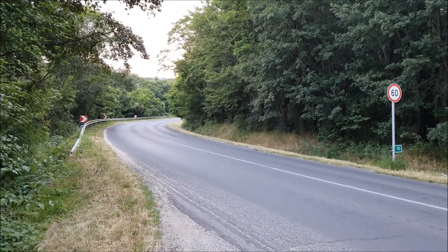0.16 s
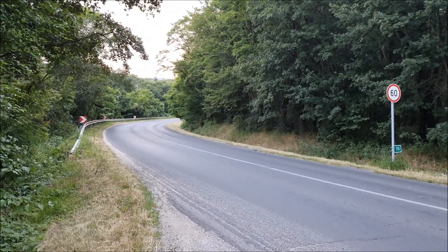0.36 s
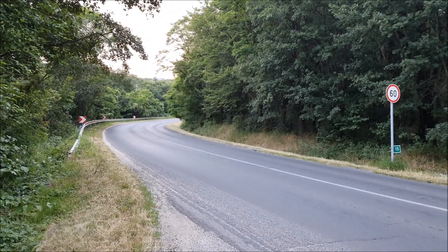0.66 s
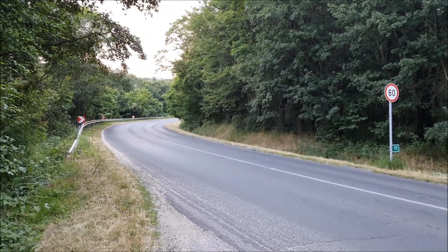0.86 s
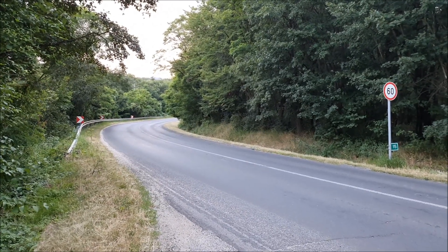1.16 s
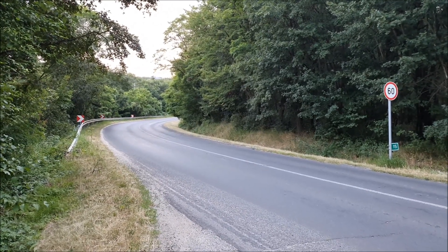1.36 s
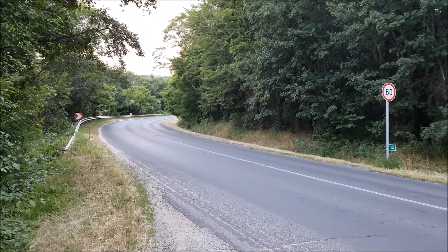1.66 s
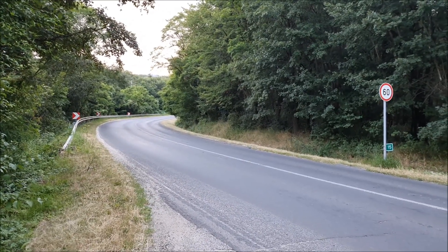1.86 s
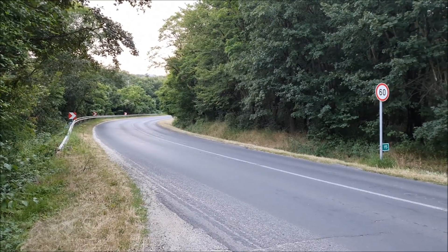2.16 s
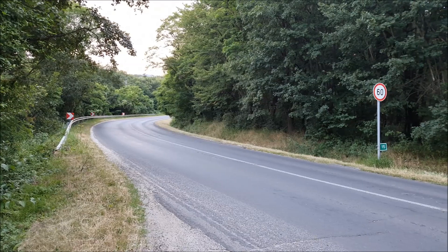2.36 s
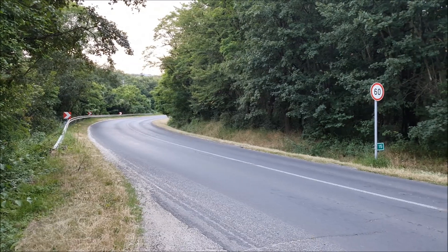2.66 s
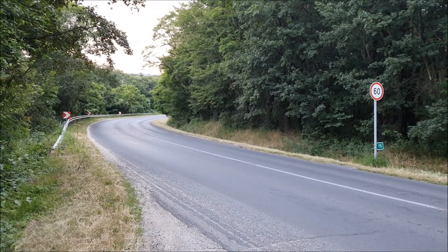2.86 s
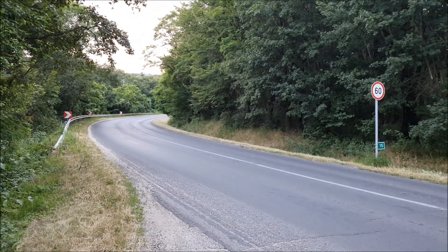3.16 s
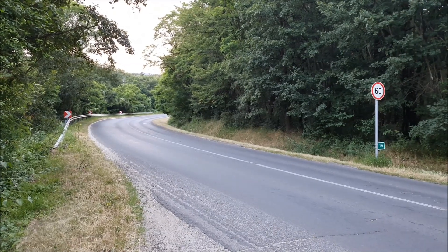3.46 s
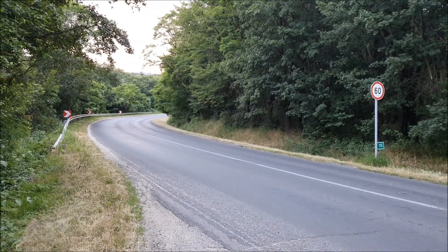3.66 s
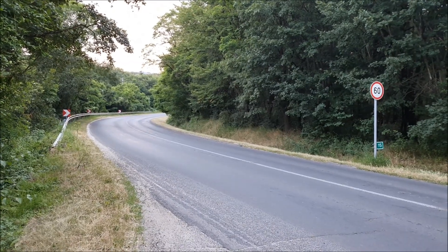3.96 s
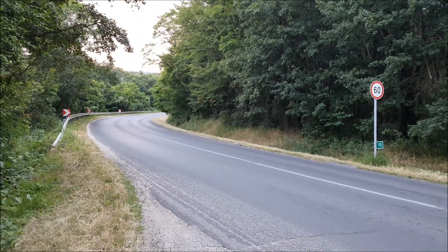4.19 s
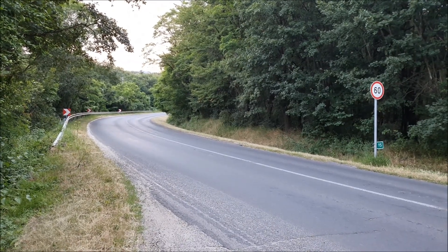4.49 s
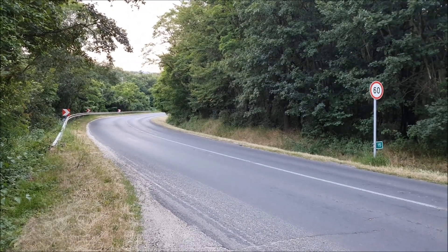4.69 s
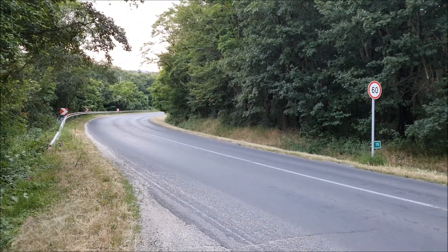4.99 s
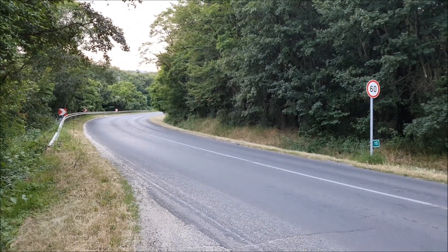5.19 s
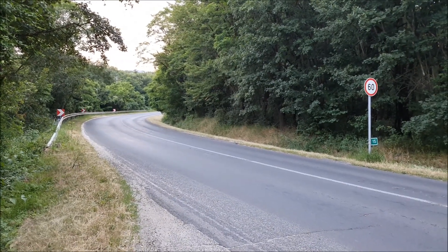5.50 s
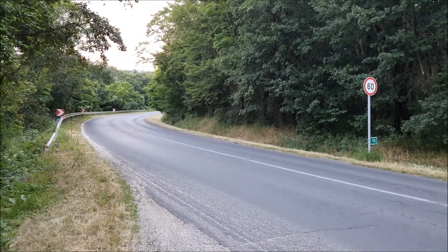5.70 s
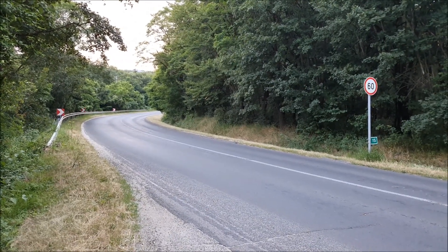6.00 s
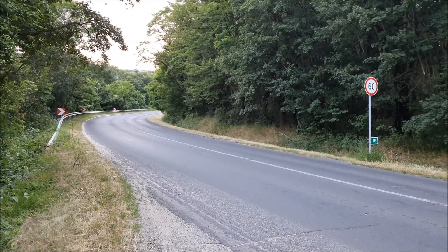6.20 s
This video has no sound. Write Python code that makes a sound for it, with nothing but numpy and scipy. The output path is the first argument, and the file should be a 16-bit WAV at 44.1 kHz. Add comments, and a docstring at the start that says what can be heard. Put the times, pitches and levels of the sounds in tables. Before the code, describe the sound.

An unseen six-cylinder car drones lower on a forest road, then its exhaust pops and cracks sharply, echoing among the trees.

```python
"""A forest road: a six-cylinder car coasts away behind the trees, its exhaust droning lower and lower.
The drone is a sine at the firing order; wavering sines at other crank orders and shaped noise join it.
Unburnt fuel pops in the pipe: a dull thump, then a sharp crack of scattered shocks.
Decaying noise echoes ring among the trunks; a low squeak, then far birds, are short gliding sines.
Two microphone ports hear it all over a thin hiss."""
import sys
import numpy as np
from scipy import signal
from scipy.fft import rfft, irfft, next_fast_len
from scipy.io import wavfile
from scipy.ndimage import uniform_filter1d, map_coordinates

SR = 44100
rng = np.random.default_rng(int(sys.argv[2]) if len(sys.argv) > 2 else 0)


def persist_wave(psi):
    """Save psi, clipped to +-1, as 16-bit WAV."""
    counts = np.round(np.clip(psi, -1, 1) * 32767).astype(np.int16)
    wavfile.write(sys.argv[1], SR, np.atleast_2d(counts).T)


N = 279679
TIME = np.arange(N) / SR  # seconds

# Course of the car's levels: (time [s], drone level [dB], tyre roar level [dB])
CAR_LEVELS = [(0, -31.5, -40), (.2, -30.5, -43), (.3, -26.5, -43), (.6, -29, -45), (1.4, -29.5, -46),
              (2.1, -28.5, -47), (3.25, -30.5, -48.5), (3.55, -32.5, -49.5), (4.05, -41, -51.5),
              (4.4, -35.5, -51.5), (5.0, -38.5, -46.5), (6.34, -39, -49.5)]
# Crank orders beside the firing order: (order [cycles per crank turn], relative level [dB])
SIDE_ORDERS = [(1, -12), (2, -4.5), (4, 1), (5, -2.5), (6, -20), (7, -16), (8, -11.5), (9, -11.5),
               (10, -14), (13, -13.5), (14, -7.5), (15, -21.5), (18, -20)]
# Missed firings: (time [s], gap length [s], drone drop [dB], below 0 counts as none)
STUMBLES = [(0.236, 0.041, -2), (0.438, 0.042, 23), (1.536, 0.01996, 3.5)]
# Spectrum of the exhaust rumble: (frequency [Hz], relative level [dB])
RUMBLE_SPECTRUM = [(20, -31), (45, -13.5), (80, 7), (150, 1.5), (200, 6), (245, -6.5), (350, 1), (520, -5),
                   (640, -10.5), (900, -22.5), (2000, -33.5), (4500, -53), (7500, -70.5), (12000, -80.5)]
# Spectrum of the tyre roar: (frequency [Hz], relative level [dB])
ROAR_SPECTRUM = [(350, -40.5), (600, -24), (780, 2.5), (1040, -3), (1300, -1), (1700, -3.5), (2000, -12.5),
                 (2400, -16), (2800, -27), (3200, -31), (4000, -35.5), (5000, -47), (6500, -59.5),
                 (7500, -69), (9000, -94)]
# Pops: (time of the suction [s], thump level [dB], thump pitch [Hz], crack level [dB],
# crack brightness [dB per octave], crack length [s], favoured resonance [Hz], resonance boost [dB])
POPS = [(1.524, -33, 105.3, -23, 0, 0.0035, 1880, -0.5), (3.628, -25, 100, -16.5, -1, 0.0044, 1193, 3),
        (3.637, -5.5, 90.5, -13, -1.5, 0.0076, 1730, 17.5), (4.595, -18, 169, -7, 0.5, 0.0037, 1080, 3),
        (4.599, -35, 117, -10.5, -0.5, 0.0065, 760, 6.5), (4.611, -17.5, 84, -46, 1.5, .006, 2120, 5),
        (4.949, -17.5, 111, -10.5, -1, 0.0073, 760, 1.5), (5.186, -15.5, 99, -20, -1, .006, 1250, 7),
        (5.3967, -18, 105.5, -18, 4.5, 0.0044, 940, 1.5), (5.5963, -18, 114, -24.5, -2, 0.0062, 741, 3),
        (5.8394, -16, 104, -20.5, 1, 0.009, 905, 9), (6.014, -19.5, 108, -23.5, -2.5, 0.0084, 1671, 10),
        (6.205, -17, 111, -16.5, 0, 0.0071, 1640, 10)]
# Colour the pipe gives a crack: (frequency [Hz], relative level [dB])
PIPE_COLOUR = [(250, -13), (450, -5.5), (600, -3.5), (760, 3), (950, -3), (1150, -2.5), (1400, -8.5),
               (1700, -6), (2100, -6.5), (2600, -12), (3500, -16.5), (4400, -32.5), (5400, -50.5),
               (6200, -64.5), (7400, -81), (9000, -60), (13000, -74.5)]
# Silencer ring on each thump: (pitch [Hz], time to its peak [s], level relative to the crack [dB])
SILENCER_RING = (418, 0.0022, -14)
# Echo decay among the trunks: (frequency [Hz], time to lose 60 dB [s])
FOREST_DECAY = [(100, 1.7), (400, 2.8), (1000, 0.51), (2500, .85), (4000, .6), (5500, 0.48), (10000, 0.069)]
# Colour of the echoes: (frequency [Hz], relative level [dB])
FOREST_TONE = [(100, -24.5), (220, -13.5), (400, 4.5), (1000, -13.5), (1700, -3.5), (2800, -10), (4000, -3),
               (5200, 3.5), (8000, -4.5)]
# Squeak and bird notes, the first row a short low squeak, probably of the car, the others birds:
# (time [s], length [s], start pitch [Hz], end pitch [Hz], level [dB],
# trill amount [0-1], left minus right ahead of the ports [dB])
NOTES = [(0.251, 0.047, 1213, 1256, -36.5, 1, -1), (0.324, 0.081, 5970, 5750, -65.5, .9, 6.5),
         (0.409, 0.098, 6000, 5820, -64, 0.98, 4.5), (0.598, 0.047, 5900, 5720, -73, 0.8, 14),
         (0.971, 0.073, 3710, 3840, -65, .9, 1.5), (1.284, 0.043, 3300, 3120, -59, 0.5, 9),
         (1.61, 0.07, 4760, 4460, -66, 1, -1.5), (1.79, 0.016, 3750, 3744, -62.5, 0.7, -0.5),
         (1.814, 0.033, 5140, 5170, -73, 0.6, -6.5), (1.861, 0.078, 3080, 2980, -67.5, .6, 0),
         (2.031, 0.046, 3810, 3750, -52.5, .2, 4.5), (2.076, 0.073, 3870, 3950, -66, 0.96, 3),
         (2.124, 0.091, 2730, 2650, -65.5, 1, 0), (2.31, 0.051, 3100, 3060, -69.5, .6, 2.5),
         (2.512, 0.076, 3430, 3320, -46.5, .25, -3), (2.749, 0.078, 3540, 3200, -48.5, 0.5, 2.5)]
# Spectrum of the microphone hiss: (frequency [Hz], relative level [dB])
HISS_SPECTRUM = [(3000, -21), (6000, -10.5), (7500, -23.5), (7900, -3.5), (8700, -3), (9800, -1),
                 (10600, -7.5), (12000, -7.5), (15700, -17.5)]
# Course of the hiss: (time [s], level [dB])
HISS_LEVELS = [(0, -76.5), (.25, -79.5), (.45, -81.5), (.6, -77.5), (3.6, -77.5), (3.75, -86), (4.3, -79),
               (5.5, -78), (6.34, -77.5)]
# Phase between the ports: (frequency [Hz], lead of the left port [radians])
PORT_LEAD = [(200, 0), (520, .3), (860, .5), (1200, 1), (1550, 1.8), (1900, 2.7), (2300, 2.2), (2900, 2.5),
             (3600, 3.1), (4300, 3.9), (5100, 6.28)]
# Level between the ports: (frequency [Hz], left minus right [dB])
PORT_TILT = [(100, -1.24), (500, -1), (860, -2), (1200, -6), (1600, -5), (2200, -7), (2800, 3), (4000, -6),
             (5800, 5), (7200, -13.5), (8600, 17.5), (9500, 9), (10700, -1), (12000, 2)]
# How alike the two channels of a noise are: (frequency [Hz], likeness [0-1])
LIKENESS = [(100, 1), (300, 0.85), (700, 0.42), (1500, 0.89), (2300, .5), (3200, 0.4), (5000, 0.8),
            (8000, 0.1), (11300, 0.82), (12500, 0.3), (15000, .55)]

FIRING = 3  # the crank order at which the cylinders fire
CRANK_HZ, SAG_HZ_PER_S = 40.28, 1.53  # crank turns a second at the start, and how fast they sink
SLIP_PER_S2 = 95  # share of speed lost in a missed firing, times the square of the gap length
CATCH_UP_S = 0.04  # time constant of the speed's return after a missed firing
LIFT_S = 0.16  # the throttle shuts
OVERRUN_S, OVERRUN_RAMP_S = 4.6, 0.45  # start of the overrun burble and the time it takes to set in
# Side orders: throttle open, time to lose 10 dB, coasting, overrun
SIDE_OPEN_DB, SIDE_FALL_S, SIDE_COAST_DB, SIDE_OVERRUN_DB = -32, 0.06, -47.5, -44
BRIGHT_COAST_DB, BRIGHT_OVERRUN_DB = -0.5, -3  # brightness of the side orders, dB per octave
FOURTH_OVERRUN_DB = 2.5  # uneven burning lifts the fourth order
SIDE_WAVER_DB = 3  # rms level waver of each side order
# Rumble: throttle open, time to lose 10 dB, coasting
RUMBLE_OPEN_DB, RUMBLE_FALL_S, RUMBLE_COAST_DB = -29.5, 0.89, -48
# Rumble left by a pop: relative to its thump, swell time, time to lose 10 dB
GURGLE_DB, GURGLE_RISE_S, GURGLE_FALL_S = -29.5, 0.12, 0.58
SUCTION_S = 0.015  # from the start of a thump to its suction
CRACK_AFTER_S = 0.0168  # from the suction to the open crack
WAVER = 0.024  # rms pitch unsteadiness of a fully trilled note, as a share
NOTE_LAG_S = 0.00004  # squeak and birds come this much later on the left, ahead of the ports
LOW_CUT_HZ, EDGE_HZ = 31, 15700  # bass cut and upper band limit


def engine():
    """The firing order drones clean, the other orders waver; rumble and tyre roar lie under them."""
    s, *columns = np.transpose(CAR_LEVELS)
    drone_db, roar_db = (np.interp(TIME, s, column) for column in columns)
    crank_hz = CRANK_HZ - SAG_HZ_PER_S * TIME
    overrun = np.clip((TIME - OVERRUN_S) / OVERRUN_RAMP_S, 0, 1)
    rumble_power = gain_of(2 * RUMBLE_COAST_DB) + fading(RUMBLE_OPEN_DB, 0, RUMBLE_FALL_S)

    # a missed firing leaves a gap and the next ones come late
    for at, length, drop_db in STUMBLES:
        gap = np.exp(-((TIME - at) / (length / 2)) ** 4)
        drone_db = drone_db - max(drop_db, 0) * gap
        catching_up = np.exp(-abs(TIME - at) / CATCH_UP_S)
        slip = np.where(TIME > at, catching_up, gap)
        crank_hz = crank_hz * (1 - SLIP_PER_S2 * length ** 2 * slip)

    # the blast empties the pipe: the drone has to build up again, the pipe gurgles on
    for at, thump_db, *_ in POPS:
        drone_db = drone_db - 7 * np.exp(-((TIME - at - 0.025) / 0.023) ** 2)
        swell = np.clip((TIME - at) / GURGLE_RISE_S, 0, 1)
        rumble_power = rumble_power + swell * fading(thump_db + GURGLE_DB, at, GURGLE_FALL_S)

    phase = 2 * np.pi * np.cumsum(crank_hz * (1 + 0.006 * drift(12))) / SR
    drone = gain_of(drone_db + 0.74 * drift(13)) * np.sqrt(2) * np.sin(FIRING * phase)
    side = side_orders(phase, overrun)
    rumble = np.sqrt(rumble_power) * noise(RUMBLE_SPECTRUM, 0.95)
    roar = gain_of(roar_db) * noise(ROAR_SPECTRUM, 1.3)
    return drone + side + rumble + roar


def side_orders(phase, overrun):
    """Sines at the other crank orders: they sink as the throttle shuts and come up again on overrun."""
    floor_db = SIDE_COAST_DB + (SIDE_OVERRUN_DB - SIDE_COAST_DB) * overrun
    closing = 10 ** (-np.maximum(TIME - LIFT_S, 0) / SIDE_FALL_S)
    power = gain_of(2 * floor_db) + gain_of(2 * SIDE_OPEN_DB) * closing
    bright_db = BRIGHT_COAST_DB + (BRIGHT_OVERRUN_DB - BRIGHT_COAST_DB) * overrun
    total = np.zeros(N)
    for order, db in SIDE_ORDERS:
        level_db = db + bright_db * np.log2(order / FIRING) + SIDE_WAVER_DB * drift(5.9)
        if order == FIRING + 1:
            level_db = level_db + FOURTH_OVERRUN_DB * overrun
        total += gain_of(level_db) * np.sin(order * phase + 1.0 * drift(6))
    return np.sqrt(power) * total


def pops():
    """A muffled rattle rides on each thump, the open crack follows; thumps, cracks and blasts apart."""
    thumps, cracks, blasts = np.zeros((3, N))
    for s, thump_db, hz, crack_db, bright_db, length, peak_hz, peak_db in POPS:
        add(thumps, s - SUCTION_S, gain_of(thump_db) * thump(hz, crack_db - thump_db))
        rattle, _ = crack(bright_db - 6.5, 0.023, peak_hz, 0, rise=0.01)
        add(cracks, s - 0.003, gain_of(crack_db - 7.5) * rattle)
        sound, blast = crack(bright_db, length, peak_hz, peak_db, rise=0.0013)
        add(cracks, s + CRACK_AFTER_S, gain_of(crack_db) * sound)
        add(blasts, s + CRACK_AFTER_S, gain_of(crack_db) * blast)
    return thumps, cracks, blasts


def thump(hz, crack_over_thump_db):
    """A short swing of pressure around a sharp suction; its pitch sags as it dies, the silencer rings."""
    t = np.arange(-SUCTION_S, 0.04, 1 / SR)
    turns = hz * (t - 10 * t ** 2 * (t > 0))
    width = np.where(t < 0.002, 0.006, 0.012)  # swells faster than it dies
    shape = np.exp(-((t - 0.002) / width) ** 2)
    ring_hz, ring_peak_s, ring_db = SILENCER_RING
    u = np.maximum(t + 0.0022, 0) / ring_peak_s
    ring = u * np.exp(1 - u) * np.cos(2 * np.pi * ring_hz * t)
    snatch = 0.35 * np.exp(-(t / 0.00085) ** 2)  # the suction comes to a sharp point
    return -np.cos(2 * np.pi * turns) * shape - snatch - gain_of(crack_over_thump_db + ring_db) * ring


def crack(bright_db, length, peak_hz, peak_db, rise):
    """One shock, then scattered ones, coloured by the pipe and the long way through the trees.

    Also their energy as one blast without the favoured resonance, which is what the trunks send back."""
    t, hz = np.arange(1500) / SR, np.fft.rfftfreq(4096, 1 / SR)
    size, chance = rng.standard_normal((2, len(t)))
    envelope = np.exp(-(t / length) ** 2) * np.minimum(t / rise, 1)
    shocks = 0.38 * size * (abs(chance) > 1.7) * envelope
    shocks[0] = -(0.0041 / length) ** 2  # short cracks open with the hardest shock
    colour_db = read(PIPE_COLOUR, hz) + bright_db * np.log2(hz / 760 + 0.084)
    plain_ring = causal(colour_db)
    octaves_off = np.log2(hz / peak_hz + 1e-9)
    resonance_db = peak_db * np.exp(-(octaves_off / 0.16) ** 2)
    sound = np.convolve(shocks, causal(colour_db + resonance_db))
    peak = abs(sound).max()
    return sound / peak, plain_ring * np.linalg.norm(shocks) / peak


def forest(x):
    """Echoes from many trunks: they build up, then each band dies at its own speed."""
    taps = rng.standard_normal((2, SR + SR // 2))
    taps[1] = 0.52 * taps[0] + 0.75 * taps[1]  # the two ears hear partly the same echoes
    hz, t, z = signal.stft(taps, SR, nperseg=256)
    decay_db = -60 * t / read(FOREST_DECAY, hz)[:, None]
    build_up = 1 - np.exp(-t / 0.0022)
    z *= gain_of(read(FOREST_TONE, hz)[:, None] + decay_db) * build_up
    tail = signal.istft(z, SR, nperseg=256)[1]
    tail = tail / np.linalg.norm(tail[0])
    echoes = signal.fftconvolve(x[None], tail, axes=1)[:, :N]
    swaying = np.arange(N) + 2.5 * drift(70)  # stirring leaves and air blur the pitch of the echoes
    return np.array([map_coordinates(ear, [swaying], order=3) for ear in echoes])


def squeak_and_birds():
    """Wavering sines that slide quickly to their end pitch, some trilled, each from its own side."""
    out, waver = np.zeros((N, 2)), drift(300)
    half = np.array([[0.5], [-0.5]])  # left and right share each difference
    for s, length, start_hz, end_hz, db, trill, pan_db in NOTES:
        u = np.linspace(0, 1, int(length * SR))
        glide_hz = end_hz + (start_hz - end_hz) * np.exp(-5 * u)
        hz = glide_hz * (1 + WAVER * trill * waver[round(s * SR):][:len(u)])
        beat = 1 + 0.51 * np.clip(trill, 0, 1) * np.cos(2 * np.pi * 60 * u * length)  # 60 Hz trill
        envelope = np.sin(np.pi * u) ** 0.46
        turns = np.cumsum(hz) / SR - half * hz * NOTE_LAG_S
        note = gain_of(db + half * pan_db) * beat * envelope * np.sin(2 * np.pi * turns)
        add(out, s, note.T)
    return out.T


def noise(spectrum, patchy_db):
    """Two partly alike channels of shaped noise with drifting patches, at rms 1 overall."""
    hz = np.fft.rfftfreq(1024, 1 / SR)
    a, b, c, d, patches = rng.standard_normal((N // 256 + 5, 513, 5)).T
    patches = uniform_filter1d(patches, size=10, axis=0)  # smooth over frequency, then over time
    patches = evened(uniform_filter1d(patches, size=12, axis=1))
    same = np.clip(read(LIKENESS, hz), 0, 1)[:, None]
    left = a + 1j * b
    right = same * left + np.sqrt(1 - same ** 2) * (c + 1j * d)
    z = np.array([left, right])
    z *= gain_of(read(spectrum, hz)[:, None] + patchy_db * patches)
    return evened(signal.istft(z, nperseg=1024, noverlap=768)[1][:, :N])


def drift(rate):
    """Slow chance of rms 1, up to rate changes a second."""
    knots = rng.standard_normal(int(N / SR * rate) + 4)
    coarse = TIME[::32]
    return evened(np.interp(TIME, coarse, map_coordinates(knots, [coarse * rate], order=3)))


def fading(db, s, fall_s):
    """Power that starts at db at time s and loses 10 dB every fall_s."""
    return gain_of(2 * db) * 10 ** (-np.maximum(TIME - s, 0) / fall_s) * (TIME >= s)


def causal(gain_db):
    """The shortest ring that has this colour, given from 0 Hz to half the sample rate."""
    log_gain = np.log(gain_of(np.r_[gain_db, gain_db[-2:0:-1]]))
    minimum_phase = np.exp(np.conj(signal.hilbert(log_gain)))
    return np.fft.ifft(minimum_phase).real[:2048]


def gain_of(db):
    """Amplitude factor of a level in dB."""
    return 10 ** (np.asarray(db) / 20)


def evened(x):
    """Scale to rms 1."""
    return x / np.sqrt(np.mean(x ** 2) + 1e-20)


def read(points, hz):
    """Read a table at hz, straight lines over log frequency."""
    f, value = np.transpose(points)
    return np.interp(np.log(hz + 1), np.log(f + 1), value)


def add(mix, s, sound):
    """Lay a sound into the mix at time s, cut off at the end."""
    part = mix[round(s * SR):][:len(sound)]
    part += sound[:len(part)]


def scene():
    """Car, pops, squeak and birds heard directly, with the forest's echoes of all but the engine."""
    thumps, cracks, blasts = pops()
    notes = squeak_and_birds()
    sent = gain_of(-19) * thumps + gain_of(-10.0) * blasts + gain_of(-13.5) * notes.mean(0)
    echoes = forest(sent)
    return engine() + thumps + cracks + notes + echoes


def record(dry):
    """Hiss joins, the deepest bass drops, two ports differ in phase and level; then the band limit."""
    size = next_fast_len(N + 4096)
    hz = np.fft.rfftfreq(size, 1 / SR)
    # each port takes half of the difference
    left = gain_of(read(PORT_TILT, hz) / 2) * np.exp(0.5j * read(PORT_LEAD, hz))
    ports = np.array([left, 1 / left])
    hiss_db = np.interp(TIME, *np.transpose(HISS_LEVELS))
    hissing = dry + gain_of(hiss_db) * noise(HISS_SPECTRUM, 1.1)
    low_cut = 1 / np.sqrt(1 + (LOW_CUT_HZ / (hz + 1e-9)) ** 6)
    heard = irfft(rfft(hissing, size) * low_cut * ports, size)[:, :N]
    band_limit = signal.firwin(511, EDGE_HZ, window=("kaiser", 9), fs=SR)
    return signal.oaconvolve(heard, band_limit[None], "same")


dry = scene()
out = record(dry)
persist_wave(out)
```